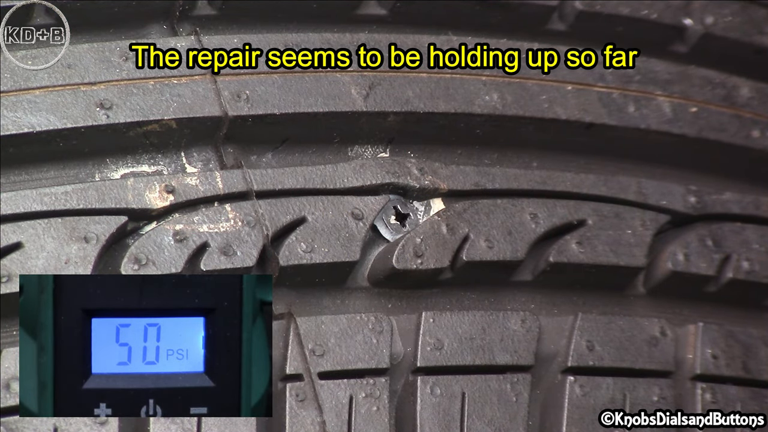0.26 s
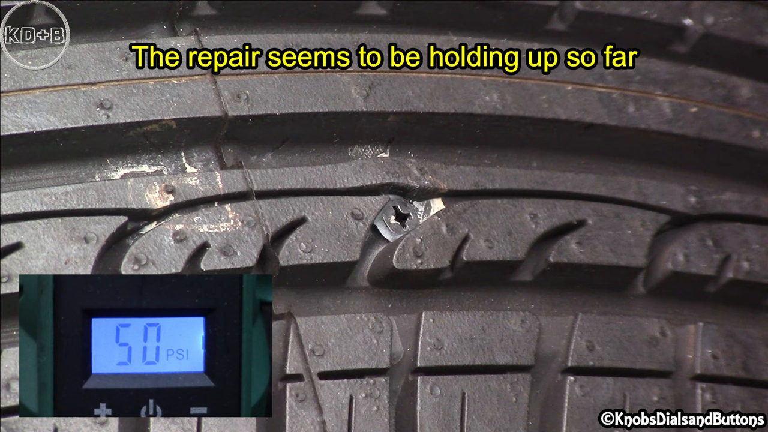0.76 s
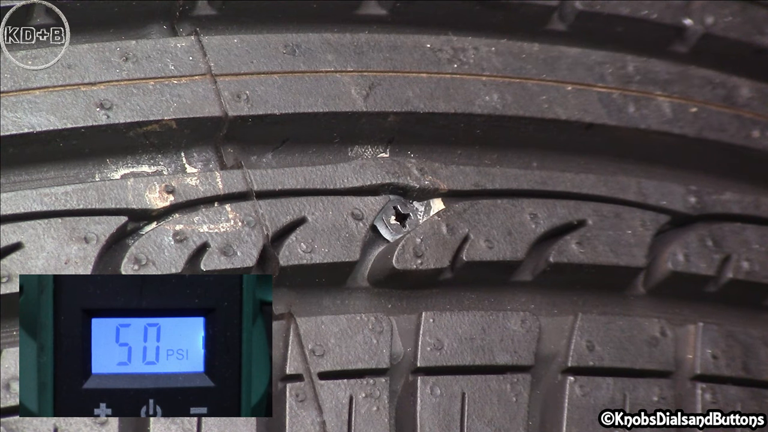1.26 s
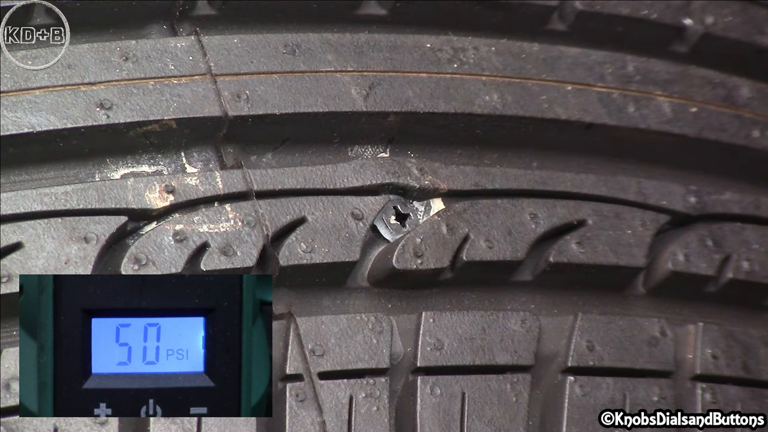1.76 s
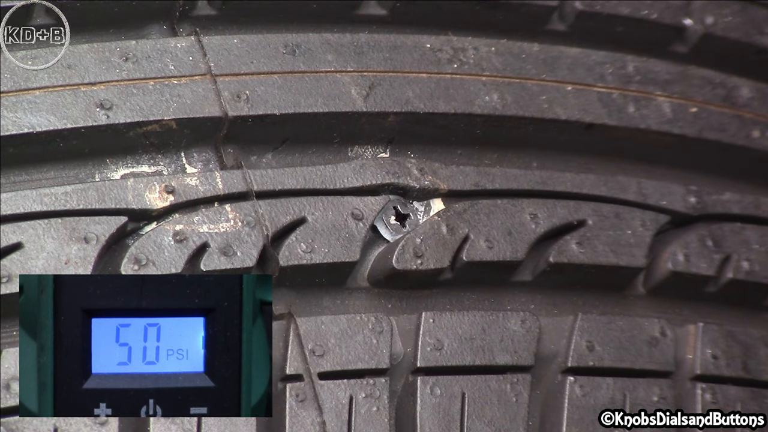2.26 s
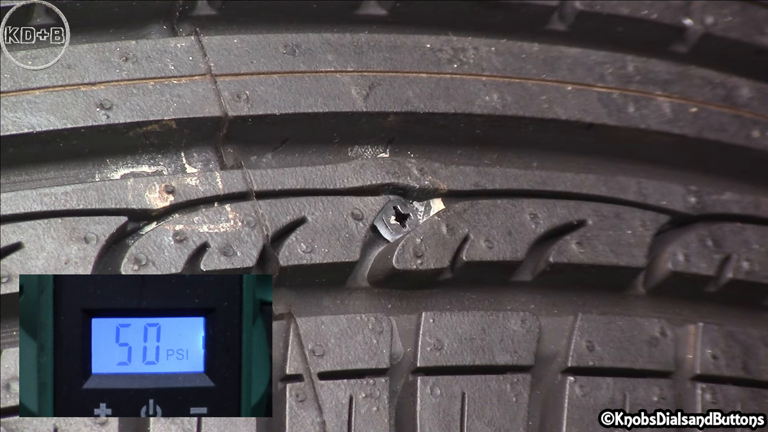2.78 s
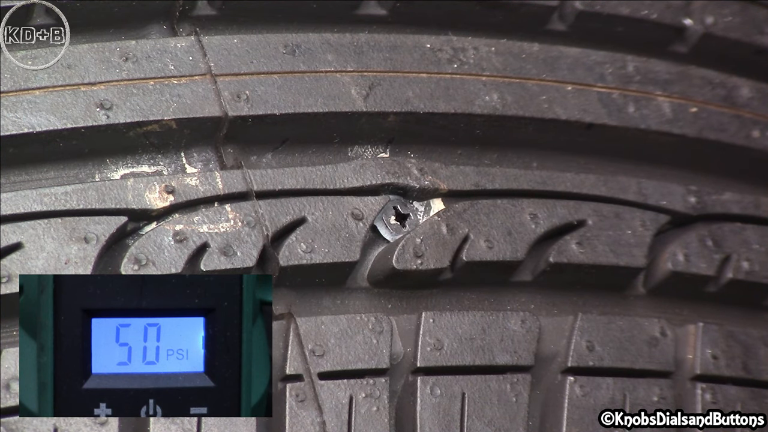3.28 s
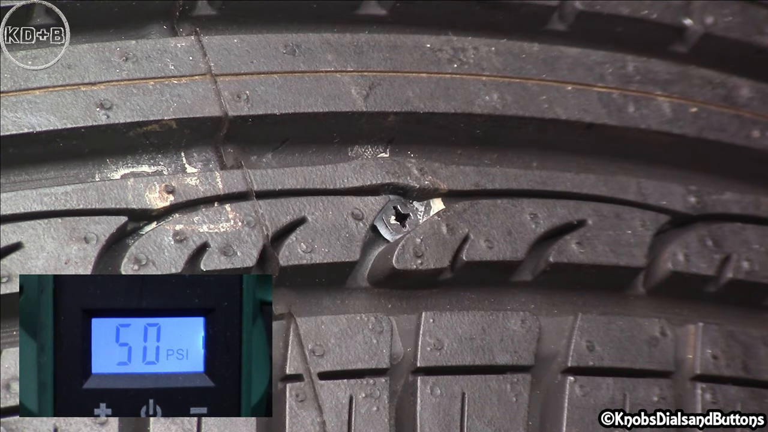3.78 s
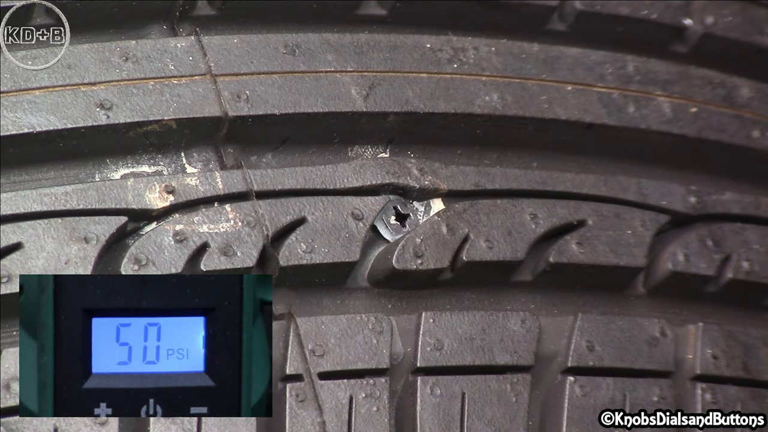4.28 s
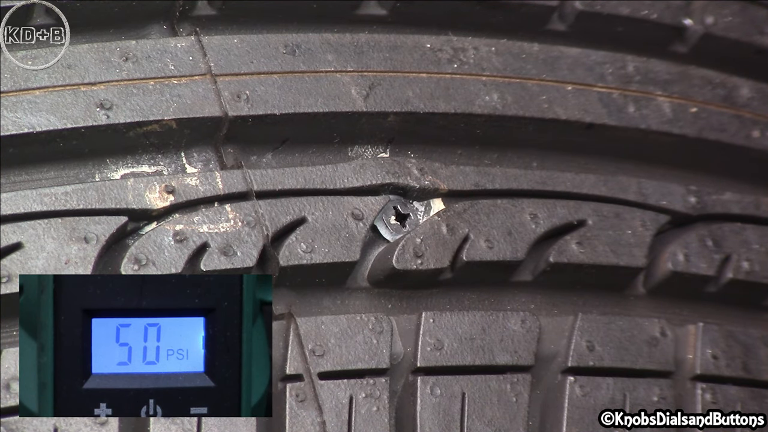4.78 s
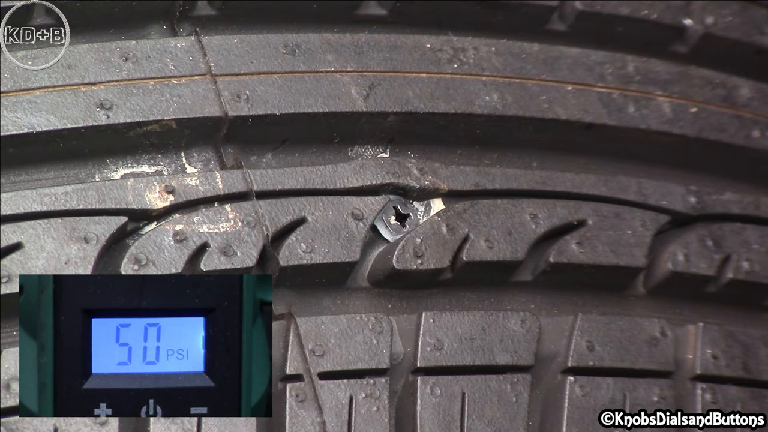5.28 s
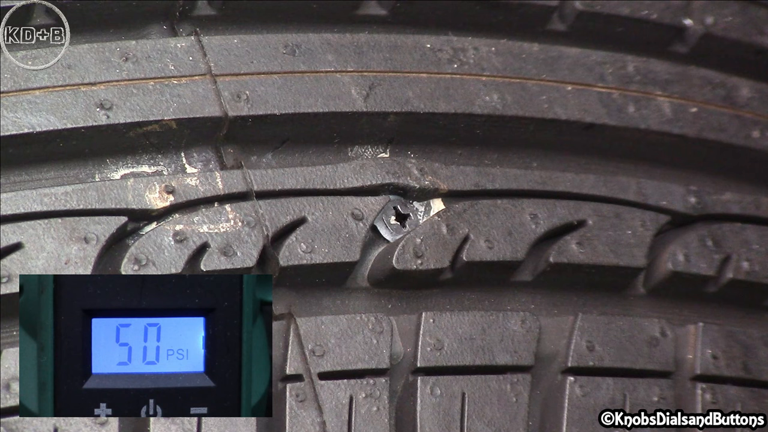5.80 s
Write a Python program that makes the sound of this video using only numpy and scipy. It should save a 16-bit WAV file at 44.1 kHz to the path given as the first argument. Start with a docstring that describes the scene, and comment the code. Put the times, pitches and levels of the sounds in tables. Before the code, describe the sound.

Close, dense and abrasive compressor noise fills the first four seconds almost unchanged: low motor buzz, hard valve knocks, bright rattling teeth. Power cuts and the strokes drop in pitch and die away quickly, ending in a puff of leaking air and several small clicks. Then quiet outdoor air with distant road rumble, slowly rising slightly, and a barely audible squeak.

```python
"""A step away from a small piston compressor, with traffic far off, we hear it run, lose power and coast to a halt.
Every crank turn the air valve thumps and knocks ring the housing; the gear teeth clatter harder under load.
Impulses timed by the crank angle, passed through filters, make these blows; sine tones make the motor shake.
Hollow groans, a short hiss and a few ticks end the run. Filtered noise makes the traffic that remains.
A faint squeal follows, while the gain control creeps up."""
import sys
import numpy as np
from scipy import signal
from scipy.fft import rfft, irfft
from scipy.io import wavfile
from scipy.ndimage import uniform_filter1d

SR = 44100
rng = np.random.default_rng(int(sys.argv[2]) if len(sys.argv) > 2 else 0)


def master_out(mix):
    """Clip the mix to full scale and print it as 16-bit PCM to the path in sys.argv[1]."""
    frames = np.transpose(np.atleast_2d(mix))
    ceiling = np.clip(frames, -1, 1)
    pcm = np.round(ceiling * 32767).astype(np.int16)
    wavfile.write(sys.argv[1], SR, pcm)


N = 266584  # length of the sound in samples
BINS_HZ = np.arange(1, 4098) * SR / 8192  # frequencies at which filter curves are drawn

# Far traffic, colour of its noise: (frequency [Hz], relative level [dB])
TRAFFIC_COLOUR = [(15, -47), (35, -24), (75, 0.5), (130, -5), (190, -2.5), (300, -8.5), (500, -10),
                  (900, -13), (1300, -21.5), (2000, -27), (3500, -35), (8000, -41), (15000, -44.5)]
# Left-right difference of the traffic, relative to the shared part: (frequency [Hz], level [dB])
TRAFFIC_SIDE = [(60, -7.5), (110, -12.5), (200, -16.5), (380, -5.5), (700, -7.5), (1290, -6), (2380, 0),
                (4400, -2), (8120, 1.5), (15000, 1)]
TRAFFIC_DB = -70

# Faint squeal: loudest moment, level there before its flutter, and slopes up to and down from it
SQUEAL_S, SQUEAL_DB, SQUEAL_RISE_DB_PER_S, SQUEAL_FALL_DB_PER_S = 5.71, -84, 45, 55
# its pitch is lowest when it is loudest
SQUEAL_HZ, SQUEAL_DROP_HZ_PER_S, SQUEAL_LIFT_HZ_PER_S = 2010, 500, 280

# Reflections that differ left and right: (frequency [Hz], level [dB])
NEARBY_SIDE = [(60, -36.5), (110, -43), (200, -70.5), (380, -13), (700, -27.5), (1290, -15.5), (2380, -16),
               (4400, -11.5), (8120, -12), (15000, -6)]
NEARBY_T60_S = 0.22  # time for the reflections to fall 60 dB
# Left minus right for the machine itself: (frequency [Hz], difference [dB])
LEFT_RIGHT_LEAN = [(100, 0), (250, -.6), (500, 0), (1300, 0), (2400, -.6), (4400, -2.8), (8000, .2),
                   (15000, 0)]

# Air valve thump: (multiple of the crank rate [-], relative level [dB])
THUMP_SHAPE = [(1, -14), (2, -9), (3, -5.5), (4, -4.5), (5, -1.5), (6, -11), (7, -28), (8, -10), (9, -7.5),
               (10, -21.5), (11, -7), (12, -15), (13, 6), (14, 4.5), (15, -5), (16, -5.5), (17, -8.5),
               (18, -10), (19, -5), (20, -10.5), (21, -7.5), (22, -30), (23, -18)]
THUMP_DB, THUMP_AT = -33, 0.3488  # level, crank angle in turns
# Motor shake, side tones come from the crank:
# (multiple of the motor rate [-], crank multiples added [-], level [dB])
UNBALANCE = [(1, 2, -64), (1, 4, -53), (1, 8, -66), (1, 9, -55), (1, 11, -62), (1, 12, -62), (1, 15, -62),
             (1, 16, -61), (2, 0, -60), (2, 11, -61), (3, -1, -61), (3, 0, -52), (3, 1, -57), (3, 7, -63)]
# Thin tones just above some crank multiples, beating slowly: (multiple [-], level [dB])
BEATS = [(9, -61), (10, -59), (14, -55), (17, -56), (20, -62)]
BEAT_OFFSET = .064  # in crank multiples
# Knocks: (crank angle [turns], level [dB], centre [Hz], width of each filter pass [Hz],
# swing with the pinion angle [dB], shift with the pinion angle [ms])
KNOCKS = [(0.0046, -33.5, 2910, 970, -3.5, 0.12), (.225, -28.5, 2770, 1300, 1.1, 0.03),
          (.4, -36.5, 2900, 680, 3, .05), (.17, -36, 5417, 500, 1.2, 0.02),
          (0.27, -43.5, 5000, 2500, -0.5, 0.025), (.26, -36.5, 7800, 3700, 0, 0.069)]

# Force on the teeth round one turn: (crank angle [turns], force [dB])
TOOTH_LOAD = [(0, 0), (.1, 2.5), (.17, 1.5), (.27, 2), (.4, 1.5), (.5, -8.5), (.65, -4), (.8, -7.5),
              (.9, -5.5), (1, 3.5)]
GEAR_TEETH, PINION_TEETH = 49, 11
MESH_DB, MESH_LOW_HZ, MESH_TOP_HZ, RATTLE_DB = -27.5, 1096, 8000, -27

# Resonances of the housing: (frequency [Hz], width [Hz], relative level [dB])
HOUSING = [(534.6, 81, -9), (842, 84, -10.5), (1120, 20, -13), (2239, 180, -8), (2660, 310, -1.5),
           (3120, 300, -8), (3500, 270, -4.5), (3908, 96, -4), (4280, 140, -8), (4270, 51, -8),
           (4590, 79, -3.5), (4750, 80, 1.5), (5140, 64, -0.5), (5437, 188, -3.5), (5670, 60, -14.5),
           (6265, 170, -11.5), (6980, 150, -12), (7927, 150, -7.5), (8140, 250, -12.5), (9550, 400, -9.5),
           (10140, 200, -10), (10850, 160, -17.5), (11690, 89, -25.5)]
# Broad colour between the resonances: (frequency [Hz], relative level [dB])
SHELL = [(30, -45.5), (100, -35), (300, -24), (600, -20.5), (1400, -22.5), (2000, -11), (3100, 2),
         (3800, -18.5), (5200, -17.5), (6000, -15), (9800, -21.5), (14300, -29), (15700, -51)]
# A part that rings on: (frequency [Hz], level [dB], time to fall 60 dB [s])
RINGING_PART = (2462, -69, 1.0)

# Strokes weaken while coasting: (time [s], level [dB])
COAST_FADE = [(4.22, -1.5), (4.26, -5), (4.3, -5.5), (4.334, -7.5), (4.375, -20), (4.412, -33), (4.45, -59),
              (4.48, -75)]
THUMP_FADE = 0.98  # dB of thump for each dB of fade
# Trapped air groans in the last strokes: (time [s], level [dB], centre [Hz], waver [Hz], spread [ms])
GROANS = [(4.253, -37, 453, 89.3, 4.6), (4.271, -37, 420, 118.4, 3), (4.298, -39, 400, 121.5, 3.4),
          (4.324, -45, 793, 25.2, 3.6), (4.333, -43, 341, 118.7, 3), (4.352, -54, 200, 40, 3.5),
          (4.365, -38, 780, 25.2, 6.8), (4.409, -58.5, 300, 119, 4)]
# Mechanism settles: (time [s], peak level [dB], centre [Hz], decay [ms])
TICKS = [(4.396, -43, 6000, 3.0), (4.414, -48, 4000, 2), (4.431, -52, 4000, 1.5), (4.439, -50, 4200, 1.5),
         (4.45, -53, 4200, 1.5), (4.5, -60, 4200, 1.5), (4.54, -61, 3800, 1.5), (4.551, -57, 2800, 5.0),
         (4.565, -65, 4000, 1.5), (4.606, -70, 3000, 3)]
SEEP_S, SEEP_DB, SEEP_RISE_DB_PER_S, SEEP_FALL_DB_PER_S = 4.36, -53, 570, 90  # air seeps past the valve
SEAL_S, SEAL_DB = 4.472, -9  # the valve seats and the hiss drops

TURN_HZ = 56.87  # crank rate used to place the thump's colour
# crank angle and rate at 0 s; the rate sags as the tyre fills
START_TURNS, START_HZ, SAG_HZ_PER_S = -.29, 56.948, .04
CUT_S, COAST_S = 4.233, .142  # power off; time constant of the run-down
SPEED_WANDER_TURNS = .016
TURNS = 247  # crank turns that are given blows

HOLD_DB, RECOVER_DB_PER_S = -23, 4.5  # gain control: level held, speed of recovery
TOP_HZ = 15600  # upper limit of the sound


def undb(db):
    """Turns decibels into a plain factor."""
    return 10 ** (np.asarray(db) / 20)


def level(x, db):
    """Scales a sound so that the rms of its first four seconds has this level."""
    return x * undb(db) / np.sqrt(np.mean(x[:4 * SR] ** 2))


def curve_db(table):
    """Draws a smooth filter curve through (frequency [Hz], level [dB]) points."""
    hz, db = np.transpose(table)
    return np.interp(np.log(BINS_HZ), np.log(hz), db)


def colour(x, db, lag=1):
    """Filters with this gain curve; lag 1 only rings after a blow, less also swells before it."""
    # folding the cepstrum gives the phase of a filter that only rings afterwards
    cepstrum = irfft(np.log(undb(db)))
    cepstrum[1:4096] *= 2
    cepstrum[4097:] = 0
    log_gain = rfft(cepstrum)
    response = irfft(np.exp(log_gain.real + 1j * lag * log_gain.imag))
    taps = np.roll(response, 2048)
    return signal.fftconvolve(x, taps)[2048:N + 2048]


def band(x, hz, width):
    """Keeps a band of frequencies with a two-pole filter applied twice."""
    b, a = signal.iirpeak(hz, hz / width, SR)
    return signal.lfilter(b, a, signal.lfilter(b, a, x))


def walk(rate):
    """Wanders at random, spread near 1: levels held 1 / rate seconds, then smoothed twice."""
    k = int(SR / rate)
    steps = np.repeat(rng.standard_normal(N // k + 1), k)
    return 1.3 * uniform_filter1d(uniform_filter1d(steps, k), k)[:N]


def tent(at_s, rise, fall):
    """Distance below a peak that is reached at one slope and left at another."""
    t = np.arange(N) / SR - at_s
    return np.maximum(-rise * t, fall * t)


def traffic():
    """Far rumble whose bands swell and flicker; alike left and right only in the bass."""
    mid, side = 0, 0
    for hz in 35 * 2. ** np.arange(9):  # one band per octave
        swell = undb(1.2 * walk(3.8))
        mid = mid + swell * band(rng.standard_normal(N), hz, hz)
        side = side + swell * band(rng.standard_normal(N), hz, hz)
    mid = colour(mid, curve_db(TRAFFIC_COLOUR))
    side = colour(side, curve_db(TRAFFIC_COLOUR) + curve_db(TRAFFIC_SIDE))
    scale = undb(TRAFFIC_DB) / np.std(mid)
    return scale * np.array([mid + side, mid - side])


def squeal():
    """A thin, broken tone that dips in pitch as it swells."""
    pitch = SQUEAL_HZ + tent(SQUEAL_S, SQUEAL_DROP_HZ_PER_S, SQUEAL_LIFT_HZ_PER_S)
    pitch = pitch * (1 + .011 * walk(60))
    tone = np.sqrt(2) * np.sin(2 * np.pi * np.cumsum(pitch) / SR)
    tone = tone * (1 + .6 * walk(35))  # flutter in level
    return undb(SQUEAL_DB - tent(SQUEAL_S, SQUEAL_RISE_DB_PER_S, SQUEAL_FALL_DB_PER_S)) * tone


def reflections(near):
    """Nearby surfaces return the machine's sound as a dense, fading echo made from decaying noise."""
    t = np.arange(SR // 2) / SR
    echo = rng.standard_normal(len(t)) * undb(-60 * t / NEARBY_T60_S)
    return signal.fftconvolve(near, echo / np.sqrt(np.sum(echo ** 2)))[:N]


def seep():
    """A short broad hiss of leaking air late in the run-down, quieter once the valve seats."""
    shape = [(300, -2), (800, 7), (1800, 2), (3500, 1.5), (6000, -22), (12000, -32.0)]
    hiss = level(colour(rng.standard_normal(N), curve_db(shape)), SEEP_DB)
    seal_db = SEAL_DB * (np.arange(N) > SEAL_S * SR)
    return hiss * undb(seal_db - tent(SEEP_S, SEEP_RISE_DB_PER_S, SEEP_FALL_DB_PER_S))


def groans():
    """Trapped air swells hollowly: a wavering tone at an air resonance."""
    out, t = 0, np.arange(N) / SR
    for s, db, hz, waver_hz, spread_ms in GROANS:
        tone = np.sin(2 * np.pi * np.cumsum(hz + waver_hz * walk(250)) / SR)
        swell = np.exp(-.5 * (1000 * (t - s) / spread_ms) ** 2)
        out = out + undb(db) * np.sqrt(2) * tone * swell
    return out


def ticks():
    """Short soft clicks as parts slip back: fading noise in a band."""
    out, t = np.zeros(N), np.arange(1200) / SR
    for s, db, hz, decay_ms in TICKS:
        burst = rng.standard_normal(len(t)) * np.exp(-1000 * t / decay_ms)
        click = band(burst, hz, hz ** 2 / 11000)
        start = int(s * SR)
        out[start:start + len(t)] += undb(db) * click / np.abs(click).max()
    return out


def crank():
    """Crank angle in turns: a slowly sagging rate, then an exponential run-down."""
    t = np.arange(N) / SR
    hz = (START_HZ - SAG_HZ_PER_S * t) * np.exp(-np.maximum(t - CUT_S, 0) / COAST_S)
    # the wander shrinks to nothing over the last second of power
    wander = SPEED_WANDER_TURNS * walk(7) * (t < CUT_S) * np.minimum(CUT_S - t, 1)
    return START_TURNS + np.cumsum(hz) / SR + wander


def pinion(turns):
    """Angle of the motor shaft in radians, from the gear ratio."""
    return 2 * np.pi * turns * GEAR_TEETH / PINION_TEETH


def blows(turns, at, size, late_s=0):
    """An impulse whenever the crank passes an angle, shared between two samples for fine timing."""
    place = np.clip(np.interp(at, turns, np.arange(N)) + late_s * SR, 0, N - 2)
    i = place.astype(int)
    return np.bincount(i, size * (i + 1 - place), N) + np.bincount(i + 1, size * (place - i), N)


def housing_db(lift_db):
    """Broad colour of the shell with its resonances, raised by lift_db, standing above it."""
    modes = sum(undb(2 * (db + lift_db)) / (1 + (2 * (BINS_HZ - hz) / width) ** 2)
                for hz, width, db in HOUSING)
    return 10 * np.log10(undb(2 * curve_db(SHELL)) + modes)


def unbalance(turns):
    """The motor shakes with its shaft; the crank load spreads that into side tones."""
    orders = [(m * GEAR_TEETH / PINION_TEETH + k, db) for m, k, db in UNBALANCE]
    orders += [(k + BEAT_OFFSET, db) for k, db in BEATS]
    out = 0
    for order, db in orders:
        size = np.sqrt(2) * undb(db + 1.4 * walk(8.6))
        out = out + size * np.sin(2 * np.pi * order * (turns - THUMP_AT))
    return out


def contacts():
    """Crank angles of three touches per gear tooth, and the force there."""
    at = np.arange(TURNS * GEAR_TEETH * 3) / (GEAR_TEETH * 3)
    return at, undb(np.interp(at % 1, *np.transpose(TOOTH_LOAD)))


def mesh(turns):
    """Worn teeth strike alike whenever gear and pinion meet in the same position, every eleven turns."""
    at, force = contacts()
    touch = np.arange(len(at)) % (GEAR_TEETH * 3)
    wear = rng.standard_normal((GEAR_TEETH * 3, 3))[touch].T
    pairing = rng.standard_normal((PINION_TEETH, GEAR_TEETH * 3))[at.astype(int) % PINION_TEETH, touch]
    size = 0.5 * wear[0] + 0.76 * pairing
    size = size + wear[1] * np.cos(pinion(at)) + wear[2] * np.sin(pinion(at))
    # the repeating blows fill the middle of the spectrum
    dull_db = -10 * np.log10((1 + (BINS_HZ / MESH_TOP_HZ) ** 4) * (1 + (MESH_LOW_HZ / BINS_HZ) ** 4))
    hits = blows(turns, at, size * force ** 0.15)
    return level(colour(hits, housing_db(1.2) + dull_db), MESH_DB)


def rattle(turns):
    """The loose part of each tooth contact: random in size, sign and timing, so it never repeats."""
    at, force = contacts()
    chance = rng.standard_normal((len(at), 2)).T
    size = np.sign(chance[0]) * np.abs(chance[0]) ** .6 * force
    hits = blows(turns, at, size, 6e-5 * chance[1])
    share_db = curve_db([(60, -23.0), (350, 2), (620, -2.5), (850, 2.0),
                         (1600, 0.5), (2800, -3.0), (5300, 0.5), (12000, 5.0)])
    return level(colour(hits, housing_db(1.3) + share_db), RATTLE_DB)


def knocks(turns):
    """Play in the rod and valve plates is taken up at fixed angles; the pinion angle sets how hard and when."""
    out = 0
    for angle, db, hz, width, swing_db, shift_ms in KNOCKS:
        at = np.arange(TURNS) + angle
        chance = rng.standard_normal((len(at), 2)).T
        size = undb(swing_db * np.cos(pinion(at)) + 0.5 * chance[0])
        late_s = shift_ms / 1000 * np.sin(pinion(at)) + 1.5e-5 * chance[1]
        knock = band(blows(turns, at, size, late_s), hz, width)
        out = out + level(colour(knock, housing_db(0)), db)
    return out


def valve(turns):
    """One air thump a turn; the pressure builds before it lets go."""
    at = np.arange(TURNS) + THUMP_AT
    chance = rng.standard_normal((len(at), 2)).T
    puffs = blows(turns, at, undb(.4 * chance[0]), 1.5e-5 * chance[1])
    shape = [(20, -50)] + [(k * TURN_HZ, db) for k, db in THUMP_SHAPE] + [(2500, -53.5)]
    return level(colour(puffs, curve_db(shape), lag=.3), THUMP_DB)


def ringing_part(body):
    """A part driven by the machine's sound rings on at one pitch, as a narrow resonant filter."""
    hz, db, t60_s = RINGING_PART
    b, a = signal.iirpeak(hz, hz * t60_s * np.pi / np.log(1000), SR)
    return level(signal.lfilter(b, a, body), db)


def compressor():
    """Crank-driven parts weaken as it coasts, then air and ticks join; also returns the other flank's rattle."""
    turns = crank()
    fade_db = np.interp(np.arange(N) / SR, *np.transpose(COAST_FADE))
    gear = (unbalance(turns) + knocks(turns) + mesh(turns) + rattle(turns)) * undb(fade_db)
    body = valve(turns) * undb(THUMP_FADE * fade_db) + gear
    near = body + ringing_part(body) + ticks() + groans() + seep()
    return near, rattle(turns) * undb(fade_db)


def scene():
    """Places the compressor and its reflections in stereo, with the traffic and squeal."""
    near, flank = compressor()
    echoes = reflections(near)
    side = colour(echoes + undb(-0.5) * flank, curve_db(NEARBY_SIDE))
    lean = curve_db(LEFT_RIGHT_LEAN) / 2  # half to each ear
    machine = np.array([colour(near, lean) + side, colour(near, -lean) - side])
    return machine + undb(-20.5) * echoes + traffic() + squeal()


def record(dry):
    """Gain control holds loud sound at one level and recovers slowly; peaks are rounded and the top is cut."""
    power = uniform_filter1d(np.mean(dry ** 2, axis=0), SR // 5)
    heard_db = 10 * np.log10(power[::441] + 1e-12)  # 100 readings a second
    gain_db = np.zeros(len(heard_db))
    for i in range(1, len(gain_db)):
        gain_db[i] = min(HOLD_DB - heard_db[i], gain_db[i - 1] + RECOVER_DB_PER_S / 100)
    gain = undb(np.interp(np.arange(N), 441 * np.arange(len(gain_db)), gain_db))
    soft = np.tanh(1.9 * dry * gain) / 1.9
    return signal.sosfilt(signal.ellip(10, .2, 70, TOP_HZ, fs=SR, output="sos"), soft)


dry = scene()
out = record(dry)
master_out(out)
```